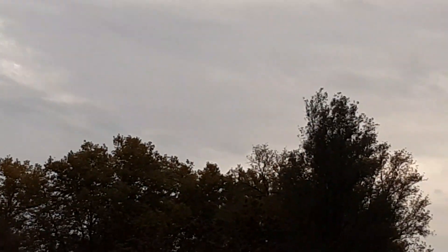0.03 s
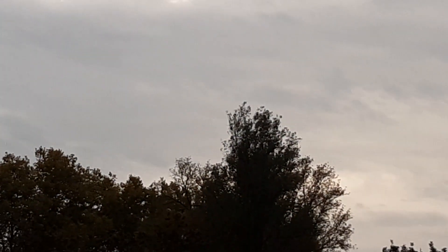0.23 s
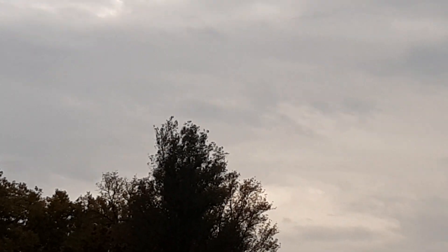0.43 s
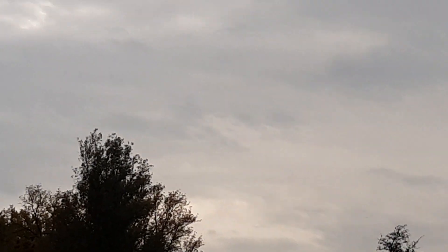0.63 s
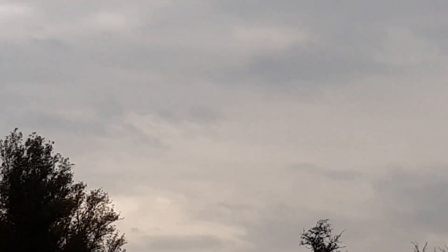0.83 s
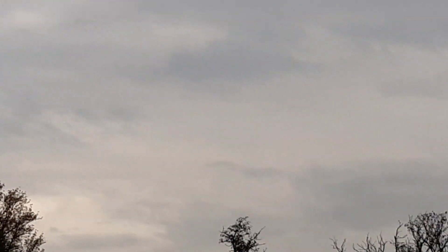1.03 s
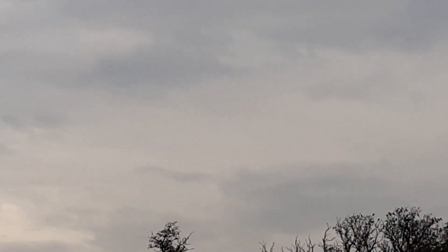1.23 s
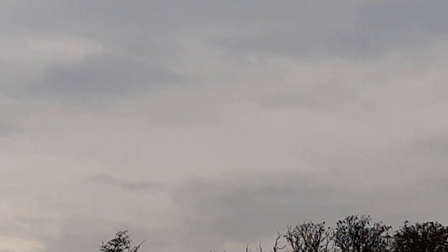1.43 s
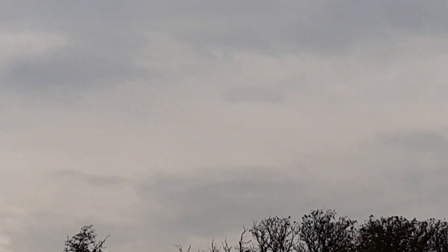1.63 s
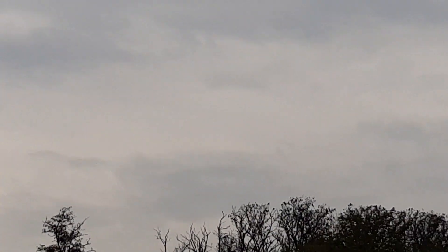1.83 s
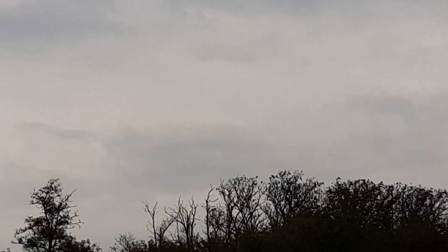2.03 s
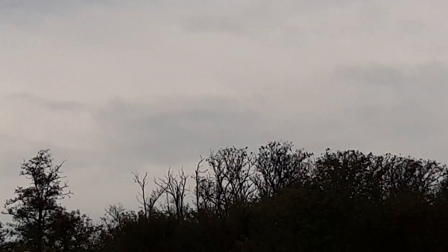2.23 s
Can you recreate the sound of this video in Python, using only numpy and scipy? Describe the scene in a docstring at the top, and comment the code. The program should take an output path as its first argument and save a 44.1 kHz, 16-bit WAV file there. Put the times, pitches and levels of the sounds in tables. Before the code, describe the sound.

Microphone handling knocks, then one thin, falling bird whistle over a faint distant rumble.

```python
"""A small bird's thin whistle hangs near 9 kHz, then slides down an octave; a line of trees scatters it back.
Other birds chirp far off over a low, distant rumble. Up close, a phone is being swung round:
a finger rubs, clicks and bumps at its two microphones, and a soft hiss, like a sliding sleeve,
swells and fades."""
import sys
import numpy as np
from scipy import signal
from scipy.fft import rfft, irfft
from scipy.io import wavfile
from scipy.ndimage import uniform_filter1d

SR = 44100
rng = np.random.default_rng(int(sys.argv[2]) if len(sys.argv) > 2 else 0)


def persist_wave(psi):
    """Save psi, clipped to +-1, as 16-bit WAV."""
    counts = np.round(np.clip(psi, -1, 1) * 32767).astype(np.int16)
    wavfile.write(sys.argv[1], SR, np.atleast_2d(counts).T)


N = 105840
T = np.arange(N) / SR

# colour of the distant rumble and microphone hiss (frequency [Hz], relative level [dB])
AIR_EQ = [(20, -15), (50, -12.5), (90, -2), (190, -11), (320, 0.5), (400, 2.5), (530, -0.5), (610, -1.5),
          (900, -9.5), (1130, -12), (1500, -21), (3500, -30), (7000, -33), (8700, -38.5), (12500, -29),
          (16000, -28)]
# fader ride of that bed (time [s], level [dB])
AIR_FADER = [(0, -63), (.5, -63), (.7, -65), (1.25, -65.5), (1.4, -66), (1.85, -65.5), (2.4, -68)]
# colour of the sliding hiss (frequency [Hz], relative level [dB])
SLEEVE_EQ = [(500, -6), (1000, 4.5), (1700, -1), (2200, -0.5), (3100, -14.5), (4300, -0.5), (6300, -2.5),
             (7600, -3.5), (8600, -13), (12500, -5), (16000, -14.5)]
# its swell and fade (time [s], level [dB])
SLEEVE_FADER = [(.2, -81), (.27, -66), (.33, -78.5), (.4, -85.5), (.52, -71), (.65, -67.5), (.77, -67.5),
                (.82, -64), (.97, -67.5), (1.15, -70.5), (1.24, -75.5), (1.5, -86.5), (1.7, -105)]
# thin hiss of the finger's first touch (frequency [Hz], relative level [dB])
TOUCH_EQ = [(4500, -35), (6000, -33), (6600, 1), (7800, -2), (8800, -10.5), (16000, -22)]
# colour of skin rubbing the case (frequency [Hz], relative level [dB])
RUB_EQ = [(200, -14), (900, -14), (1400, -3.5), (2100, -11.5), (3000, -8.5), (4700, -11), (7400, -11.5),
          (8800, -27), (13000, -24.5), (16000, -23)]
# the rub at the left microphone (time [s], level [dB])
RUB_FADER = [(.06, -101), (.085, -67.5), (.115, -56), (.165, -59.5), (.205, -51), (.217, -40), (.224, -65),
             (.24, -43.5), (.256, -41.5), (.263, -68), (.35, -87.5), (.4, -100)]
# soft thuds (time [s], start pitch [Hz], end pitch [Hz], rise [s], left level [dB], right level [dB])
BUMP_CUES = [(0.2187, 260, 120, 0.0014, -29, -48), (.2362, 390.8, 110, 0.0021, -46, -11.5),
             (0.2415, 171.4, 120, .003, -49.5, -24), (.2575, 397, 250, 0.0041, -46, -42)]
# resonances of the phone's case (frequency [Hz], relative level [dB], 60 dB decay time [s])
CASE_MODES = [(620, -3, 0.004), (1310, -5.5, 0.0065), (2890, -7, 0.0043), (4400, -1.5, .003),
              (5400, -0.5, .0025), (7276, 3, 0.0018), (10250, -9.5, 0.0014), (13000, 0, 0.0021),
              (14890, 0.5, .0017)]
# case ticks (time [s], left level [dB], right level [dB], tone centre [Hz], roll-off [dB/octave])
CLICK_CUES = [(0.11, -34, -63, 4760, 21), (0.219, -12.5, -33, 3130, 15.5), (0.2571, -0.5, -23, 14000, 4),
              (.7817, -26.5, -18.5, 5460, 23.5)]
# distant chirps (time [s], length [s], start pitch [Hz], end pitch [Hz], level [dB])
CHIRP_CUES = [(.5, .045, 4200, 4300, -79), (.55, .08, 2900, 2150, -81), (.58, .06, 6500, 4250, -79),
              (1.445, .03, 3050, 2720, -81), (1.82, .08, 4250, 4300, -88), (1.97, .065, 2450, 3080, -87),
              (1.995, .06, 4320, 4420, -84), (2.195, .08, 4280, 4480, -84)]
# the falling whistle, as heard on the right (time [s], pitch [Hz], level [dB])
WHISTLE_GLIDE = [(.97, 8750, -95), (1.075, 9020, -78), (1.14, 8790, -80), (1.156, 8510, -81),
                 (1.166, 6800, -68), (1.175, 6050, -67.5), (1.187, 5600, -61.5), (1.198, 5220, -57),
                 (1.217, 5050, -53.5), (1.243, 4710, -62), (1.268, 4500, -65.5), (1.286, 4216, -63),
                 (1.296, 4190, -83)]


def undb(db):
    """Decibels to gain."""
    return 10 ** (np.asarray(db) / 20)


def curve(table, column=1):
    """An automation lane: one table column, joined by straight lines in time."""
    rows = np.array(table)
    return np.interp(T, rows[:, 0], rows[:, column])


def wobble(per_s):
    """Smooth random modulation of spread 1 that changes about per_s times a second."""
    size = max(int(SR / per_s), 1)
    drift = uniform_filter1d(uniform_filter1d(rng.standard_normal(N), size), size)
    return drift / drift.std()


def noise(eq):
    """Wide noise of rms 1, unrelated left and right, shaped by an EQ curve."""
    hz, db = np.array(eq).T
    bins_hz = np.maximum(np.fft.rfftfreq(N, 1 / SR), 1)
    gain = undb(np.interp(np.log(bins_hz), np.log(hz), db))
    shaped = irfft(rfft(rng.standard_normal((2, N))) * gain, N)
    return shaped / shaped.std()


def tone(hz):
    """A sine of rms 1 that follows a pitch."""
    return np.sqrt(2) * np.sin(2 * np.pi * np.cumsum(hz) / SR)


def open_air(centre_share=.32, waver_db=.16):
    """The bed: a far-off rumble with faint microphone hiss on top, part wide and part centred."""
    wide = np.sqrt(1 - centre_share) * noise(AIR_EQ)
    centre = np.sqrt(centre_share) * noise(AIR_EQ)[0]
    return (wide + centre) * undb(curve(AIR_FADER) + waver_db * wobble(per_s=39))


def sleeve(grain_db=1.0):
    """A soft, fine-grained hiss, like sliding cloth, as the phone swings round."""
    return noise(SLEEVE_EQ) * undb(curve(SLEEVE_FADER) + grain_db * wobble(per_s=340))


def finger_rub(touch_at_s=.094, touch_width_s=.02, touch_db=-64.5, grain_db=2.36, right_db=-22):
    """Skin skims the case by the left microphone with a thin hiss, then catches and slips."""
    touch = noise(TOUCH_EQ) * undb(touch_db) * np.exp(-((T - touch_at_s) / touch_width_s) ** 2)
    rub = noise(RUB_EQ) * undb(curve(RUB_FADER) + grain_db * wobble(per_s=710))
    return (touch + rub) * undb([[0], [right_db]])


def finger_bumps(sag_s=.004, tightness=2.2):
    """A fingertip presses on a microphone port: a short, dull thud that sags in pitch."""
    out = np.zeros((2, N))
    for start, first_hz, last_hz, rise, left_db, right_db in BUMP_CUES:
        age = np.maximum(T - start, 0)
        cycles = last_hz * age + (first_hz - last_hz) * sag_s * (1 - np.exp(-age / sag_s))
        push = (age / rise * np.exp(1 - age / rise)) ** tightness
        out += undb([[left_db], [right_db]]) * push * np.sin(2 * np.pi * cycles)
    return out


def case_clicks(rattle_db=-17, rattle_s=.00085, right_lag_s=.00025):
    """Sharp ticks ring the case for a few milliseconds, each in its own register, with a tiny rattle."""
    out = np.zeros((2, N))
    hz, mode_db, t60 = np.array(CASE_MODES).T[:, :, None]
    age = np.arange(1024) / SR
    for start, left_db, right_db, centre_hz, rolloff in CLICK_CUES:
        gain = undb(mode_db - rolloff * np.abs(np.log2(hz / centre_hz)))
        gain /= np.sqrt(np.sum(gain ** 2))
        modes = gain * undb(-60 * age / t60) * np.sin(2 * np.pi * hz * age)
        ring = modes[::2].sum(axis=0) - modes[1::2].sum(axis=0)  # alternating polarity
        rattle = undb(rattle_db) * np.exp(-age / rattle_s) * rng.standard_normal((2, len(age)))
        for side, (arrival, db) in enumerate([(start, left_db), (start + right_lag_s, right_db)]):
            at = int(arrival * SR)
            out[side, at:at + len(age)] += undb(db) * (ring + rattle[side])
    return out


def tree_echo(call, onset_s=.01, t60_s=.44):
    """Trunks and leaves scatter a call into a wide reverb tail that blooms and dies away."""
    envelope = (1 - np.exp(-T / onset_s)) * undb(-60 * T / t60_s)
    tail = rng.standard_normal((2, N)) * envelope
    tail /= np.sqrt(np.sum(tail ** 2, axis=1, keepdims=True))
    return signal.fftconvolve(call[None], tail, axes=1)[:, :N]


def far_birds(waver_depth=.03, echo_db=-2):
    """Short, rough gliding chirps, so distant that they are nearly half echo."""
    chirps = np.zeros(N)
    waver = 1 + waver_depth * wobble(per_s=500)
    for start, length, first_hz, last_hz, db in CHIRP_CUES:
        progress = np.clip((T - start) / length, 0, 1)
        pitch = first_hz * (last_hz / first_hz) ** progress * waver
        chirps += undb(db) * np.sin(np.pi * progress) * tone(pitch)
    return chirps + undb(echo_db) * tree_echo(chirps)


def whistling_bird(waver_depth=.007, flutter_db=1.0, left_db=-14, echo_db=-7.5):
    """The lead: one pure, slightly unsteady falling whistle, panned right and echoed by the trees."""
    sounding = (T > WHISTLE_GLIDE[0][0]) & (T < WHISTLE_GLIDE[-1][0])
    soft_gate = uniform_filter1d(sounding.astype(float), size=200)
    pitch = curve(WHISTLE_GLIDE) * (1 + waver_depth * wobble(per_s=960))
    level_db = curve(WHISTLE_GLIDE, column=2) + flutter_db * wobble(per_s=960)
    call = tone(pitch) * soft_gate * undb(level_db)
    return call * undb([[left_db], [0]]) + undb(echo_db) * tree_echo(call)


def scene():
    """The mix: birds and close handling noise over the open-air bed."""
    birds = whistling_bird() + far_birds()
    handling = case_clicks() + finger_bumps() + finger_rub() + sleeve()
    return birds + handling + open_air()


def record(dry, low_cut_hz=49, high_cut_hz=15900):
    """The phone thins the deepest bass and cuts the top of the treble."""
    low_cut = signal.butter(2, low_cut_hz, "high", fs=SR, output="sos")
    high_cut = signal.ellip(8, .2, 70, high_cut_hz, fs=SR, output="sos")
    return signal.sosfilt(high_cut, signal.sosfilt(low_cut, dry))


dry = scene()
out = record(dry)
persist_wave(out)
```